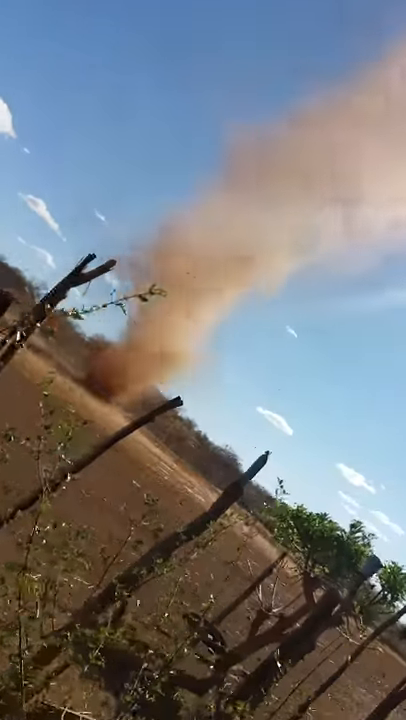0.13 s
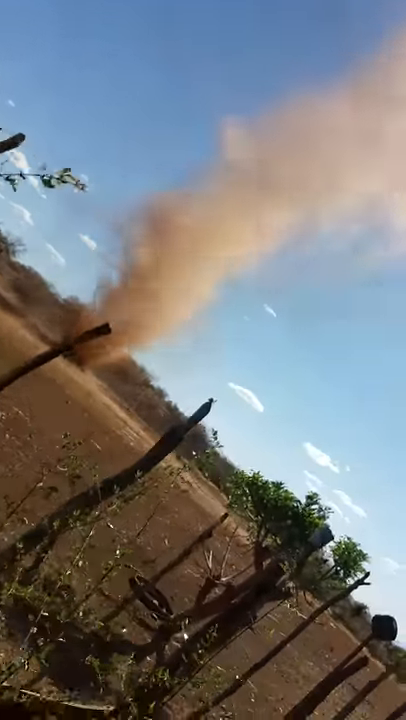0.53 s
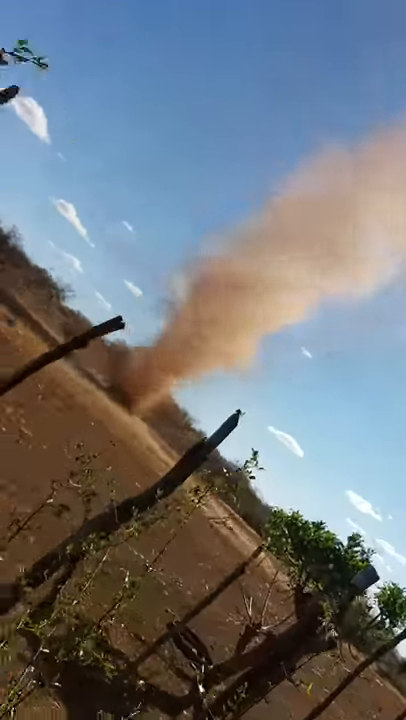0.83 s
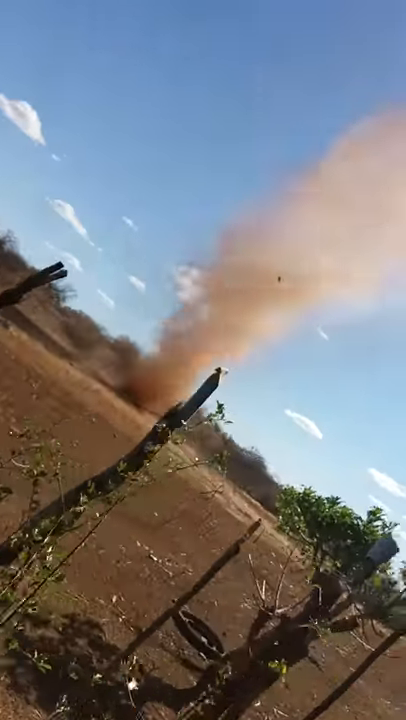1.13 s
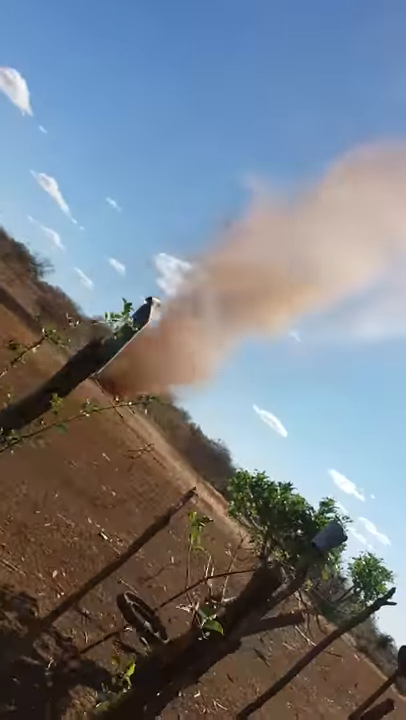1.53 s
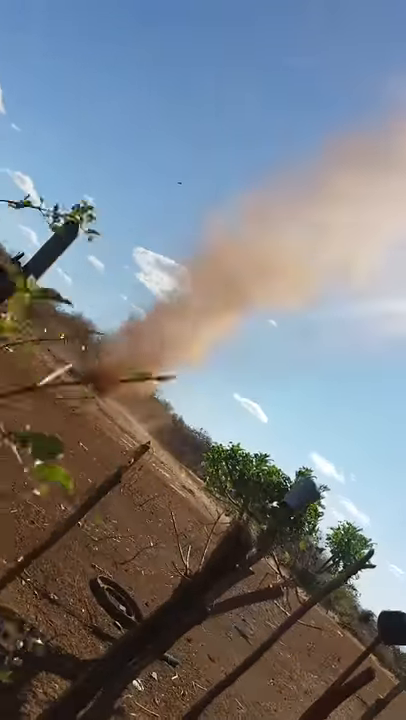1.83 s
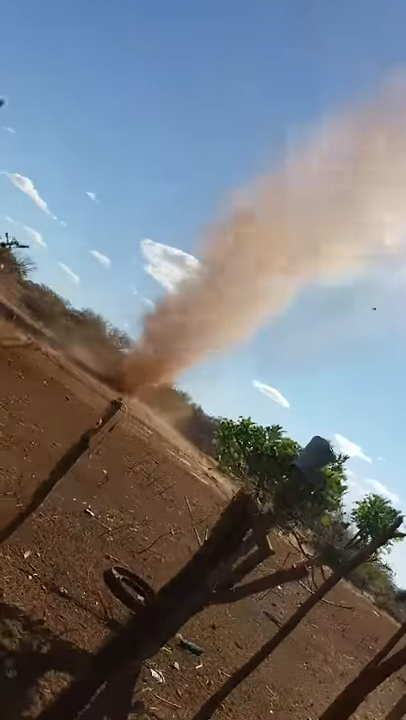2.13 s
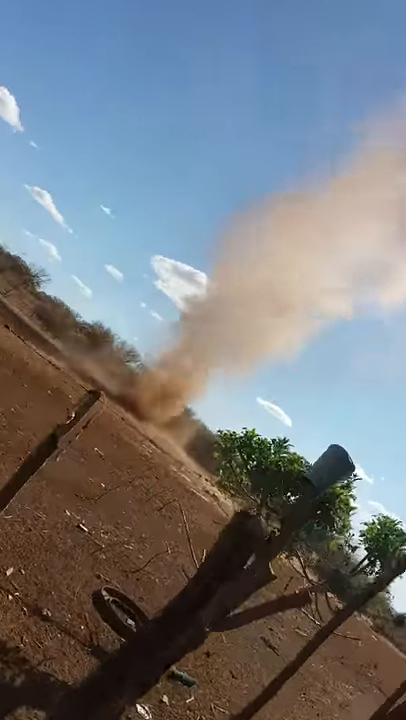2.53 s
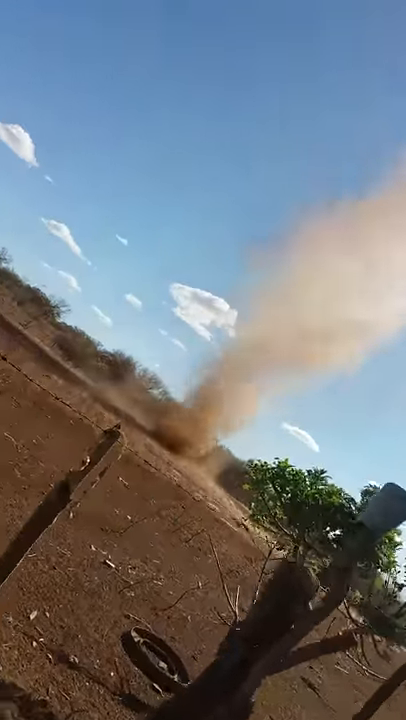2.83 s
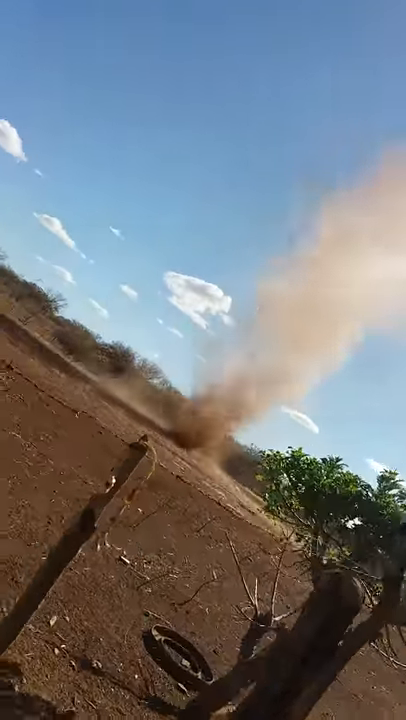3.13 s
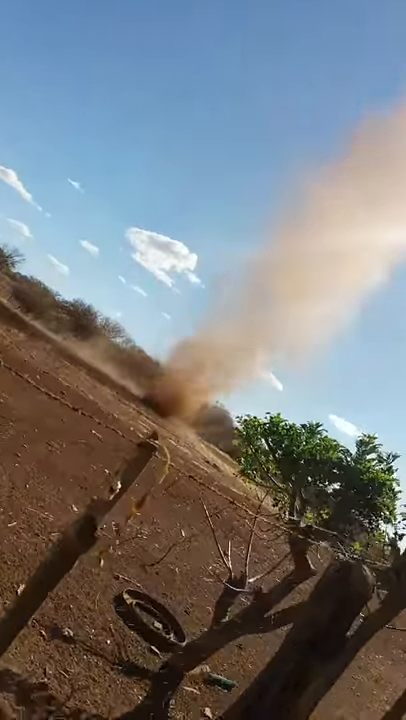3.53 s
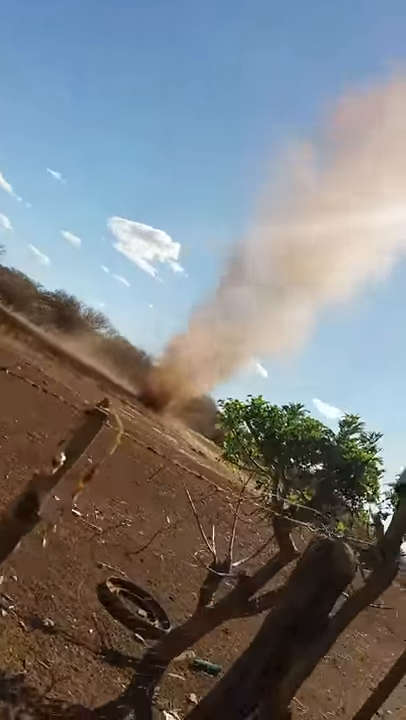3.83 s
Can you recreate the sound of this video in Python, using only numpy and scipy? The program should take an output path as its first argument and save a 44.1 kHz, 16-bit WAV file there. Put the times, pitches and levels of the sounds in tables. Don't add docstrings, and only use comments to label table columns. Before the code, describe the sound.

Wind buffets the microphone from the start: deep lumpy rumble with hard pressure thumps, heaviest around 0.7-0.8 and 1.3 seconds. Brittle twig snaps and grit ticks poke through, the sharpest near 1.0, with a soil scuff around 0.7. The gust weakens and stops by about 2.3, amid grainy scuffs near 2.2. Afterwards only a quiet rush through dry brush, faint breathy whistling and tiny ticks remain until 4.

```python
import sys
import numpy as np
from scipy import signal
from scipy.io import wavfile

SR = 44100
rng = np.random.default_rng(int(sys.argv[2]) if len(sys.argv) > 2 else 0)


def decibels_to_gain(level_db):
    exponent = np.asarray(level_db, float) / 20
    return 10 ** exponent


def digitize_waveform(pressure):
    field = np.atleast_2d(pressure).T
    bounded = np.clip(field, -1, 1)
    quanta = np.round(bounded * 32767).astype(np.int16)
    wavfile.write(sys.argv[1], SR, quanta)


N = 176400
PORT_CUT_HZ = 62.3
HISS_CUT_HZ = 6500

# pitch_hz, density_db [dB per Hz]
FAR_WIND_TONE = [(18, -45), (30, 0), (65, -3.5), (249, -9), (281, -8.5), (383, -10), (1200, -34),
                 (1560, -58), (2640, -120)]
# pitch_hz, density_db [dB per Hz]
BRUSH_TONE = [(410, -10.5), (700, -4), (1270, -14), (1390, 1), (1580, -17.5), (2420, -9), (3480, -23),
              (5220, -13.5), (9000, -32), (11700, -54), (19800, -120)]
# time_s, rush_db, murmur_db
AIR_FLOW = [(0, -46, -67), (.25, -48.5, -51), (.5, -49.5, -56.5), (.7, -48.5, -53.5), (1.0, -50.5, -54.5),
            (1.35, -50.5, -49.5), (1.6, -48.5, -55.5), (1.8, -52, -61.5), (2.08, -51.5, -61.5),
            (2.3, -53, -61), (2.51, -58.5, -62), (2.6, -55.5, -59), (2.69, -57, -65), (2.95, -57.5, -66),
            (3.2, -60, -63), (3.45, -55, -60), (3.75, -57, -64), (4, -59, -62.5)]
# pitch_hz, width_hz, level_db
POST_HOLLOWS = [
    (1223, 930, 3),
    (1967, 580, 2.5),
]
# start_s, length_s, level_db
WIRE_PUFFS = [(0.162, 0.16, -57), (.58, 0.094, -54), (0.673, 0.28, -52), (0.926, 0.24, -50.5),
              (1.105, 0.35, -51), (1.384, 0.32, -55), (1.84, 0.1, -66), (1.974, 0.15, -52.5),
              (2.102, 0.12, -54.5), (2.17, .2, -61), (2.377, 0.067, -59), (2.515, 0.16, -51.5),
              (3.13, .05, -56.5), (3.264, .09, -61), (3.36, 0.095, -58.5), (3.52, 0.17, -62)]
# start_s, length_s,
# level_db, start_pitch_hz, end_pitch_hz
SOIL_SCUFFS = [(0.537, 0.11, -50, 2100, 2170), (0.702, 0.027, -60, 5500, 5600),
               (0.736, 0.016, -52, 5500, 5000), (.79, 0.063, -55.5, 5800, 6100),
               (.86, 0.031, -55.5, 5500, 4800), (1.04, 0.032, -56, 7800, 6300),
               (1.943, 0.076, -52.5, 2000, 2150), (1.999, 0.0074, -60, 13000, 12000),
               (2.083, .03, -63, 6000, 6500), (2.123, 0.11, -51.5, 1450, 2040),
               (2.197, 0.046, -45.5, 2200, 2070), (2.226, 0.081, -43.5, 1400, 1920),
               (2.21, 0.067, -66, 2900, 2600), (2.178, 0.059, -59, 5000, 4800),
               (2.225, 0.07, -54, 4800, 6000), (2.255, 0.051, -61.5, 9000, 9600),
               (2.262, .08, -54.5, 620, 710), (2.448, 0.1, -55, 570, 520),
               (2.458, 0.048, -59.5, 2500, 2500), (2.475, 0.082, -62, 5000, 4900),
               (2.674, 0.03, -55, 2100, 2100), (2.737, 0.033, -61, 2300, 2500),
               (2.995, .05, -61.5, 5000, 4700), (3.131, .04, -61, 1900, 1700),
               (3.245, 0.082, -55, 400, 370), (3.374, 0.062, -60, 2000, 2400),
               (3.378, 0.04, -68, 5200, 5000), (3.381, 0.045, -59, 300, 300), (3.495, 0.11, -56, 420, 340),
               (3.529, 0.089, -60, 1900, 2100), (3.62, .03, -51, 2140, 2150), (3.623, .03, -61, 5000, 4600),
               (3.95, 0.063, -58.5, 2100, 2300), (1.999, .008, -59, 9000, 7700),
               (2.16, .14, -55.5, 2135, 2400), (2.282, .008, -60, 12500, 12500),
               (2.68, 0.029, -54, 570, 500), (3.69, 0.029, -58, 218, 170), (0.688, .18, -38.5, 427.3, 480)]
# start_s, peak_db, pitch_hz, t60_s
TWIG_SNAPS = [(0.1217, -35.5, 5670, 0.033), (.138, -38.5, 5000, 0.042), (.272, -42, 7500, 0.018),
              (0.52, -44.5, 5240, 0.039), (0.705, -38, 6900, .012), (.742, -39, 4200, 0.011),
              (0.78, -44.5, 6000, 0.066), (0.92, -57, 4900, 0.042), (0.978, -32.5, 7800, 0.0074),
              (0.74, -46, 5500, .01), (1.65, -42.5, 6540, 0.011), (2.833, -49, 8000, .008),
              (2.5, -54, 7000, .008), (3.74, -46, 4900, 0.017), (2.285, -48, 6000, 0.011),
              (1.041, -23, 8000, 0.0084), (1.041, -27.5, 5200, 0.013), (1.042, -43, 10700, 0.011),
              (1.041, -37, 3100, 0.012), (.979, -38, 4700, 0.011), (0.65, -35, 3700, 0.018),
              (1.686, -44, 6000, 0.025), (1.72, -46, 7400, 0.013), (2.002, -32.5, 6300, 0.012),
              (2.286, -47, 2300, .012), (2.684, -48, 4640, 0.018), (3.401, -54, 8000, 0.0088),
              (3.639, -47, 4600, 0.02)]
# time_s, rumble_db
GUST_FLOW = [(0, -26), (.2, -27), (.35, -32.5), (.47, -23), (.62, -25), (.75, -21.5), (.92, -26),
             (1.1, -30), (1.26, -32), (1.42, -29.5), (1.58, -32), (1.75, -26), (1.95, -31), (2.08, -36.5),
             (2.2, -40), (2.33, -53.5), (2.5, -93), (4, -70.5)]
# start_s, level_db, length_s, top_hz
EDDY_BURSTS = [(-.02, -19, 0.08, 368), (0.051, -19.5, 0.054, 221), (0.129, -23.5, 0.052, 280),
               (.23, -20, 0.022, 136), (0.4, -39, 0.035, 296), (0.45, -26, 0.033, 286),
               (0.601, -27, 0.078, 370), (0.498, -24.5, 0.12, 172), (0.656, -12.5, 0.058, 260),
               (0.705, -17, 0.088, 232), (0.756, -18, 0.0564, 340), (0.794, -18.5, 0.035, 288),
               (0.839, -27, 0.046, 384), (0.874, -21.5, 0.055, 209), (0.987, -21, 0.041, 363),
               (1.142, -28, 0.054, 282.8), (1.192, -20, 0.026, 277), (1.307, -17, 0.049, 328),
               (1.354, -19.5, 0.0625, 277), (1.443, -17, 0.061, 266), (1.504, -27.5, 0.061, 330),
               (1.628, -22.5, 0.05, 280), (1.683, -19.5, 0.036, 216), (1.714, -23, 0.041, 350),
               (1.776, -25, 0.015, 330), (1.856, -19, 0.051, 226), (1.91, -27, 0.064, 171),
               (2.115, -23, 0.036, 164)]
# crest_s, peak_db, pitch_hz
PRESSURE_SLAPS = [(.101, -22.5, 420), (.148, -17.5, 295), (.675, -8, 168), (.779, -7, 308),
                  (.800, -10.5, 357), (.894, -25, 420), (0.994, -14, 260), (1.199, -17, 330),
                  (1.332, -6, 320), (1.461, -25, 200), (1.647, -41, 328), (1.717, -37, 396),
                  (1.741, -19, 373), (1.772, -23, 404), (1.88, -18, 260), (2.132, -18.5, 197)]


def rms_one(x):
    return x / np.sqrt(np.mean(x ** 2) + 1e-20)


def in_time(rows):
    s, *columns = np.transpose(rows)
    return [np.interp(np.arange(N) / SR, s, column) for column in columns]


def drift(rate_hz):
    r = np.exp(-2 * np.pi * rate_hz * 40 / SR)
    noise = rng.standard_normal(N // 40 + 2002)
    slow = signal.lfilter([1], [1, -2 * r, r * r], noise)[2000:]
    return np.interp(np.arange(N) / 40, np.arange(len(slow)), rms_one(slow))


def resonate_twice(x, hz, width_hz):
    return resonate(resonate(x, hz, width_hz), hz, width_hz)


def resonate(x, hz, width_hz):
    r = np.exp(-np.pi * width_hz / SR)
    poles = [1, -2 * r * np.cos(2 * np.pi * hz / SR), r * r]
    return signal.lfilter([1, 0, -1], poles, x) * (1 - r * r) / 2


def cut(x, hz, kind, order=2):
    return signal.sosfilt(signal.butter(order, hz, kind, fs=SR, output="sos"), x)


def add(out, x, s):
    i = int(s * SR)
    x = x[max(-i, 0):N - i]
    out[max(i, 0):max(i, 0) + len(x)] += x


def stroke(length_s, count):
    return np.sin(np.pi * np.clip(np.arange(count) / SR / length_s, 0, 1))


def banded(tone, patchy_db):
    hz, db = np.transpose(tone)
    out, together, white = 0, drift(10.0), rng.standard_normal((2, N))
    edges = 28 * 2 ** (np.arange(45) / 5)
    for k, (low, high) in enumerate(zip(edges, edges[1:])):
        level_db = np.interp(np.log(low * high) / 2, np.log(hz), db, left=-90, right=-90)
        flicker_db = patchy_db * (0.16 * together + 0.33 * drift(7.8))
        out = out + decibels_to_gain(level_db + flicker_db) * cut(white[k % 2], [low, high], "band")
    return rms_one(out)


def hollow(hz, width_hz):
    return rms_one(resonate_twice(rng.standard_normal(N), hz, width_hz))


def far_wind():
    return decibels_to_gain(-53) * banded(FAR_WIND_TONE, patchy_db=0.7)


def brush_rush():
    rush_db, _ = in_time(AIR_FLOW)
    dust = decibels_to_gain(-16.5) * cut(rng.standard_normal(N), HISS_CUT_HZ, "high")
    return decibels_to_gain(rush_db) * (banded(BRUSH_TONE, patchy_db=2.45) + dust)


def post_murmur():
    _, murmur_db = in_time(AIR_FLOW)
    murmur = sum(decibels_to_gain(db) * hollow(hz, width_hz) for hz, width_hz, db in POST_HOLLOWS)
    return decibels_to_gain(murmur_db - 3) * murmur


def wire_whistle():
    puffs = np.zeros(N)
    for s, length_s, db in WIRE_PUFFS:
        add(puffs, decibels_to_gain(db) * stroke(length_s, count=SR // 2), s)
    return puffs * decibels_to_gain(0.5 * drift(20.0)) * hollow(1390, width_hz=125)


def scuffs():
    grains_per_s, hollow_q = 6000, 2.7
    out, draws = np.zeros(N), rng.random((len(SOIL_SCUFFS), 3, SR // 3))
    for (s, length_s, db, hz, end_hz), (born, size, sign) in zip(SOIL_SCUFFS, draws):
        grain_level = decibels_to_gain(-2.8 * np.log(size + 0.0013))
        grit = (born < grains_per_s / SR) * grain_level * np.sign(sign - 0.5)
        narrow = rms_one(resonate_twice(grit, hz, hz / hollow_q))
        wide = rms_one(cut(resonate(grit, hz, hz), 8200, "low"))
        body = narrow + decibels_to_gain(-11) * wide
        speed = np.interp(np.arange(SR // 5) / SR, [0, length_s], [1, end_hz / hz])
        moving = np.interp(np.cumsum(speed), np.arange(SR // 3), body)
        add(out, decibels_to_gain(db) * moving * stroke(length_s, count=SR // 5), s)
    return out


def snaps():
    twig_q, rise_s, crack_db, crack_t60_s = 8, 0.001, -6, 0.015
    out, t = np.zeros(N), np.arange(SR // 8) / SR
    chance = rng.standard_normal((len(TWIG_SNAPS), SR // 8))
    for (s, db, hz, t60_s), noise in zip(TWIG_SNAPS, chance):
        ring = rms_one(resonate_twice(noise, hz, hz / twig_q)) * decibels_to_gain(-60 * t / t60_s)
        crack_fade = decibels_to_gain(crack_db - 60 * t / min(t60_s, crack_t60_s))
        crack = crack_fade * cut(noise[::-1], [2600, 9500], "band", order=3)
        add(out, decibels_to_gain(db) * (ring + crack) * (1 - np.exp(-t / rise_s)), s)
    return out


def rumble():
    rumble_hz, flutter_hz, hz_per_db = 125.8, 253, 5
    db, = in_time(GUST_FLOW)
    db = db + 2.5 * drift(19.32)
    speed = np.clip(1.5 + hz_per_db * (db + 29.5) / rumble_hz, 0.4, 2)
    white = rng.standard_normal(2 * N + SR)
    lumps = cut(white, rumble_hz, "low", order=4)
    flutter = decibels_to_gain(-17) * cut(white[::-1], flutter_hz, "low", order=4)
    frozen = rms_one((lumps + flutter)[SR // 2:])
    return decibels_to_gain(db) * np.interp(np.cumsum(speed), np.arange(len(frozen)), frozen)


def eddies():
    rise, sag, lead_s = 0.425, 0.464, 0.008184
    out, white = np.zeros(N), rng.standard_normal((len(EDDY_BURSTS), SR // 2))
    for (s, db, length_s, top_hz), noise in zip(EDDY_BURSTS, white):
        u = np.arange(SR // 4) / SR / length_s
        swell = np.sin(u / rise * np.pi / 2) ** 2
        shape = np.where(u < rise, swell, np.exp(-((u - rise) / 0.846) ** 2))
        low = cut(noise, 1.018 * top_hz, "low", order=4)
        frozen = cut(low, PORT_CUT_HZ, "high")[SR // 4:]
        speed = 1 - sag * (1 - shape)
        body = shape * np.interp(np.cumsum(speed), np.arange(SR // 4), frozen)
        body = rms_one(body) * np.sqrt(np.mean(shape ** 2))
        fine = cut(noise[::-1], 1.98 * top_hz, "low", order=4)
        spray = shape ** 2 * rms_one(cut(fine, top_hz, "high")[SR // 4:])
        add(out, decibels_to_gain(db) * (body + decibels_to_gain(-25) * spray), s - lead_s)
    return out


def slaps():
    out, t = np.zeros(N), np.arange(-SR // 50, SR // 50) / SR
    tilts = rng.uniform(0, 2 * np.pi, len(PRESSURE_SLAPS))
    for (s, db, hz), tilt in zip(PRESSURE_SLAPS, tilts):
        bump = np.exp(-(t * hz / 0.37) ** 2 / 2)
        add(out, decibels_to_gain(db) * np.cos(2 * np.pi * hz * t + tilt) * bump, s + t[0])
    return out


def scene():
    air = far_wind() + brush_rush() + post_murmur() + wire_whistle()
    ground = scuffs() + snaps()
    gust = rumble() + eddies() + slaps()
    return (air + ground + gust)[None]


def low_pass(x):
    return signal.sosfilt(signal.butter(12, 16760, fs=SR, output="sos"), x)


def record(dry):
    hiss = decibels_to_gain(-69) * cut(rng.standard_normal(dry.shape), HISS_CUT_HZ, "high")
    x = cut(dry, PORT_CUT_HZ, "high", order=5) + hiss
    rounded = 0.8 * np.tanh(x / 0.8)
    top_cut = signal.ellip(12, 0.5, 70, 15750, fs=SR, output="sos")
    return low_pass(signal.sosfilt(top_cut, rounded))


dry = scene()
out = record(dry)
digitize_waveform(out)
```